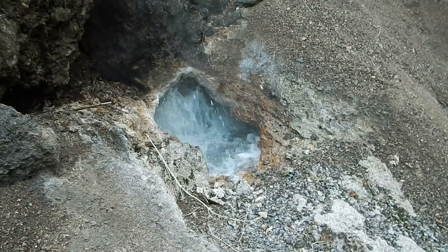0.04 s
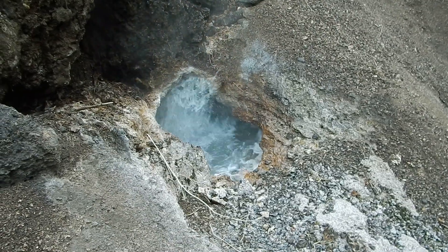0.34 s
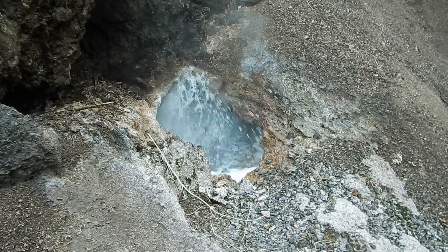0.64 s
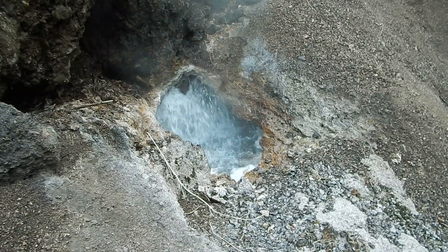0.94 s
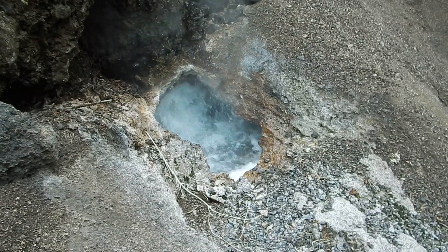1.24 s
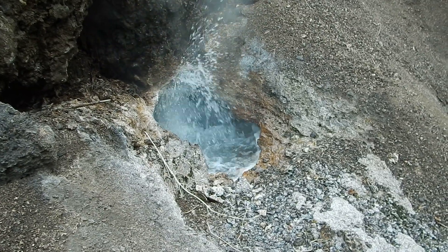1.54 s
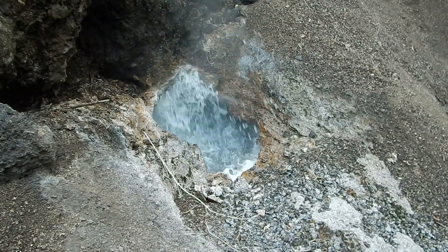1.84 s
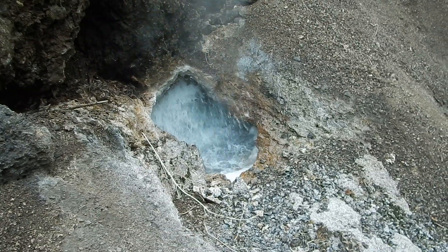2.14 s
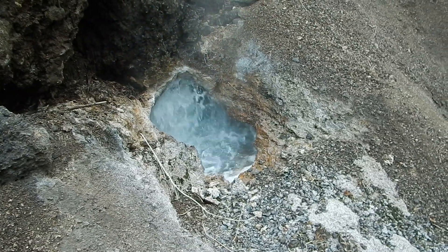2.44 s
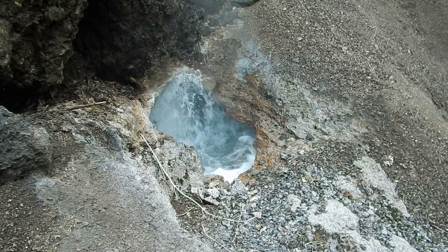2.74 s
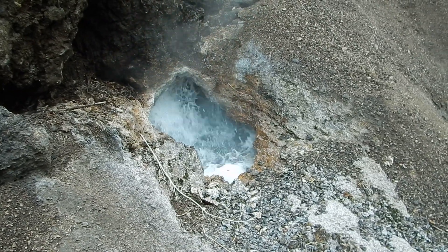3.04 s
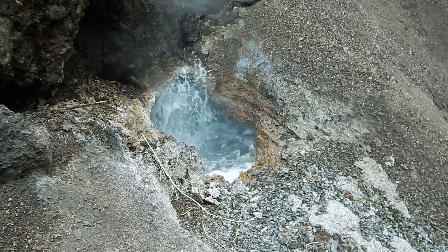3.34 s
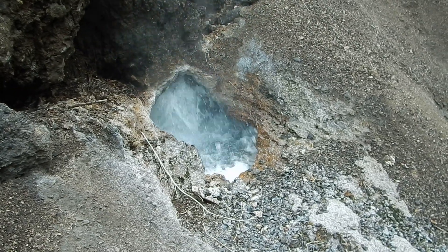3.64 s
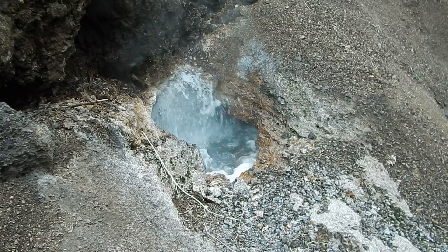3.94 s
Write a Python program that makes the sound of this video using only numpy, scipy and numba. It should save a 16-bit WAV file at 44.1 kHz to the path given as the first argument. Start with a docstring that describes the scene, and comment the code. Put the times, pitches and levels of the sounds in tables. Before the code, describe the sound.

A hot spring boils in a small rock hole outdoors, a few metres away. A strong low rumble with occasional heavy thumps runs under churning bubbles, while spray patters down in waves and water sharply slaps the rock.

```python
"""A hot spring boils in a small rock hole outdoors, a few metres away.
Big steam bubbles rumble in its throat; now and then one collapses with a heavy thump.
Smaller bubbles churn the surface. About once a second the water heaves up and rains back
as spray, and lumps of water slap the rock in sharp splats. A faint, steady hiss lies behind it."""
import sys
import numpy as np
from scipy import signal
from scipy.fft import rfft, irfft
from scipy.io import wavfile
from numba import njit

SR = 44100
rng = np.random.default_rng(int(sys.argv[2]) if len(sys.argv) > 2 else 0)


def persist_wave(psi):
    """Save psi, clipped to +-1, as 16-bit WAV."""
    counts = np.round(np.clip(psi, -1, 1) * 32767).astype(np.int16)
    wavfile.write(sys.argv[1], SR, np.atleast_2d(counts).T)


N = 176400


def gain(db):
    """Turn decibels into a number to multiply by."""
    return 10 ** (np.asarray(db) / 20)


def unit(x):
    """Scale a sound to an average (rms) strength of 1."""
    return x / np.sqrt(np.mean(x ** 2))


def loudness(rows):
    """Join (t/s, level/dB) points into a gain over time."""
    return gain(np.interp(np.arange(N) / SR, *np.array(rows).T))


def along_hz(rows, column=1):
    """Spread one column of a table smoothly from bass to treble."""
    rows = np.array(rows, float)
    hz = np.arange(N + 1) * SR / (2 * N)
    return np.interp(np.log(hz + 1), np.log(rows[:, 0]), rows[:, column])


def colour(x, tone):
    """Turn each frequency up or down by a (f/Hz, level/dB) table."""
    cepstrum = irfft(np.log(gain(along_hz(tone))))
    # make the filter ring after a sound, never before it
    cepstrum[1:N] *= 2
    cepstrum[N + 1:] = 0
    return irfft(rfft(x, 2 * N) * np.exp(rfft(cepstrum)))[:N]


def noise(tone):
    """A steady rush with the given tone."""
    return unit(colour(rng.standard_normal(N), tone))


def wander(rate):
    """Drift by about 1 either way, to a new random value `rate` times a second."""
    position = np.arange(N) / SR * rate % 4096
    return np.interp(position, np.arange(4096), rng.standard_normal(4096)) * np.sqrt(1.5)


@njit
def ring(start, hz, cycles, size, glide):
    """Each bubble is a pure note whose pitch rises as it fades."""
    out = np.zeros(N)
    for k in range(len(start)):
        length, phase = cycles[k] * SR / hz[k], 0.
        for i in range(min(int(length), N - int(start[k]))):
            age = i / length
            phase += 2 * np.pi * hz[k] * (1 + glide * age) / SR
            out[int(start[k]) + i] += size[k] * np.exp(-6 * age) * np.sin(phase)
    return out


def bubbles(lo_hz, hi_hz, cycles, spread_db, glide, count):
    """A swarm of bubbles, each with a random time, pitch and strength."""
    when, pitch, strength, length = rng.random((count, 4)).T
    hz = lo_hz * (hi_hz / lo_hz) ** pitch
    size = gain(-spread_db * np.log(1 - .99 * strength)) * hz  # boost the short, high notes
    size *= np.sign(rng.standard_normal(count))
    return unit(ring(when * N, hz, cycles * (.5 + length), size, glide))


# The deep tone of the spring's throat: f/Hz, level/dB
THROAT_TONE = [(20, -35), (40, -15), (62, -5.5), (90, -2.5), (125, -1.5), (175, 0), (235, -5), (310, -5),
               (390, -9.5), (470, -19.5), (700, -58.5), (1500, -79)]
# How hard the throat boils: t/s, level/dB
BOIL_LEVEL = [(0, -21.5), (.28, -19.5), (.45, -23), (.6, -23), (.72, -20), (.88, -22.5), (1.02, -19.5),
              (1.17, -26), (1.3, -21.5), (1.52, -22.5), (1.75, -22), (2.0, -21), (2.15, -21), (2.6, -20),
              (2.85, -21.5), (2.98, -22.5), (3.25, -23), (3.33, -22), (3.45, -20.5), (4, -20.5)]

def rumble():
    """Big bubbles throb in the throat over the roll of swirling water."""
    throbs = bubbles(82.6, 431, cycles=8.7, spread_db=1.2, glide=.12, count=2200)
    boil = unit(colour(throbs, THROAT_TONE)) + gain(-3.5) * noise(THROAT_TONE)
    return unit(boil) * loudness(BOIL_LEVEL) * gain(1.22)


# The tone of the bubbling surface: f/Hz, level/dB
SURFACE_TONE = [(300, -18), (490, -3), (610, 0.5), (900, -1), (1200, -5), (1750, -5.5), (2050, -4.5),
                (2600, -13.5), (4000, -45), (9000, -63)]
# How hard the surface churns: t/s, level/dB
CHURN_LEVEL = [(0.0, -30), (0.37, -29), (0.43, -34), (0.49, -31), (0.6, -34.5), (0.63, -29.5),
               (1.31, -30.5), (1.58, -28), (1.65, -32), (2.03, -28), (2.12, -30.5), (2.15, -26),
               (2.27, -31.5), (2.62, -29.5), (3.06, -33.5), (3.09, -27), (3.19, -30.5), (3.94, -29.5),
               (3.95, -34), (4.0, -27.5)]

def churn():
    """Small bubbles burble at the surface in a wash of foam."""
    burble = bubbles(492.7, 2793, cycles=31.7, spread_db=2.5, glide=.24, count=4000)
    foam = noise(SURFACE_TONE)
    water = unit(colour(burble, SURFACE_TONE)) + gain(-1.5) * foam
    return unit(water * gain(1.04 * wander(35))) * loudness(CHURN_LEVEL) * gain(-.39)


# The bright tone of falling drops: f/Hz, level/dB
SPRAY_TONE = [(500, -16.5), (1200, -6), (2000, -10), (2800, -5), (3500, -0.5), (4200, -3), (4800, -1),
              (5400, 0.5), (6200, -4.5), (7000, -11), (8000, -19), (9000, -25), (10200, -32),
              (11600, -37.5), (13000, -46), (16000, -48)]
# The thin, high tone of mist: f/Hz, level/dB
MIST_TONE = [(3000, -26), (6000, 3.5), (7500, 0), (9000, -7.5), (10500, -19), (12000, -29), (15000, -40)]
# How much spray is falling back: t/s, level/dB
SPRAY_LEVEL = [(0, -27.5), (.2, -31), (.35, -31), (.5, -34), (.78, -28), (1.08, -27.5), (1.2, -30),
               (1.47, -31), (1.75, -30.5), (1.93, -27.5), (2.17, -27.5), (2.36, -32.5), (2.7, -29),
               (3.17, -28.5), (3.24, -32), (3.36, -34), (3.49, -29.5), (3.7, -30), (4, -33)]

def spray():
    """Drops patter in clumps, some trapping tiny ringing bubbles, over fizz and spurts of mist."""
    when, strength, sign = rng.random((16000, 3)).T
    drop_db = -4.95 * np.log(1 - .99 * strength)  # many soft drops, a few loud ones
    ticks = np.bincount((when * N).astype(int), gain(drop_db) * np.sign(sign - .5), N)
    pings = bubbles(1700, 6000, cycles=16, spread_db=3.8, glide=.1, count=5000)
    drops = unit(colour(ticks, SPRAY_TONE)) + gain(-5) * unit(colour(pings, SPRAY_TONE))
    fizz = noise(SPRAY_TONE)
    clumps = gain(1.4 * wander(55) + 1.8 * wander(240))
    mist = noise(MIST_TONE) * gain(3.2 * wander(40) + 3.8 * wander(300))
    shower = drops * clumps + gain(-2.5) * fizz + gain(-15.5) * unit(mist)
    return unit(shower) * loudness(SPRAY_LEVEL) * gain(1.89)


# The tone of the background hiss: f/Hz, level/dB
HISS_TONE = [(2000, -10), (5000, 6.5), (7000, -6), (9000, -23), (10500, -30), (13000, -33), (16000, -29)]

def background_hiss():
    """A faint, steady hiss, separate in each channel."""
    return np.array([noise(HISS_TONE), noise(HISS_TONE)]) * gain(-48)


# Big steam bubbles collapsing, with their starting pitch: t/s, f/Hz, level/dB
COLLAPSES = [(.114, 150, -5.5), (0.77, 141, -7), (0.804, 209.5, -7), (1.348, 148, -5), (3.195, 138, -7.5)]

def thumps(swell_s=.0083, breakup_s=.015, glide=.12):
    """A big bubble's note swells and quickly dies as it breaks into smaller bubbles."""
    out = np.zeros(N)
    swarm = bubbles(116, 378, cycles=17.5, spread_db=1.5, glide=.13, count=3000)
    pieces = unit(colour(swarm, THROAT_TONE))
    swell = lambda age: age ** 2 * np.exp(2 - 2 * age)  # loudest at age 1
    for start, hz, db in COLLAPSES:
        t = np.maximum(np.arange(N) / SR - start, 0)
        age = t / swell_s
        bend = 1 + glide * np.minimum(age, 10) / 10
        body = swell(age) * np.sin(2 * np.pi * hz * t * bend)
        breakup = gain(-11.5) * swell(t / breakup_s) * pieces
        out += gain(db) * (body + breakup)
    return out


# Lumps of water hitting rock, levels relative to one another: t/s, level/dB, f/Hz
SLAPS = [(.342, -8, 4400), (0.386, -11.5, 4030), (.817, -5.5, 4200), (.98, -4, 2920), (1.009, -6.5, 4870),
         (1.241, -8, 3400), (1.3, -10, 3820), (1.629, -10, 4850), (2.077, -14, 4000), (2.147, -2, 5050),
         (2.596, -13, 4000), (2.763, -10, 5500), (2.813, -3.5, 5000), (2.921, -7.5, 3600),
         (3.508, -9.5, 5000), (3.622, -4.5, 4600), (3.7893, -12, 3500)]

def splats(slap_s=.0009, droplets_s=.0068):
    """Water slaps the rock sharply, then scatters briefly as droplets."""
    out = np.zeros(N)
    age = np.arange(2048) / SR
    fade = np.exp(-age / slap_s) + gain(-8) * np.exp(-age / droplets_s)
    for start, db, hz in SLAPS:
        burst = rng.standard_normal(len(age)) * fade
        slap = signal.lfilter(*signal.iirpeak(hz, Q=.8, fs=SR), burst)
        slap *= gain(db + 3) / np.abs(slap).max()
        at = int(start * SR)
        out[at:at + len(age)] += slap[:N - at]
    return colour(out, SPRAY_TONE)


# Sound bouncing off the rocks, compared with the direct sound: f/Hz, level/dB
ROCK_TONE = [(25, -14), (60, -21), (125, -24.5), (220, -32), (320, -46), (480, -32), (620, -33),
             (880, -42.5), (1030, -54), (1250, -56), (1600, -18.5), (2100, -17), (2400, -17), (2700, -16),
             (5000, -11), (6100, -5), (7400, -21), (8800, -5), (9800, -4.5), (11500, -4.5), (13000, -4),
             (16000, -2)]

def rock_scatter():
    """The rocks at the sides throw back a softer wash of boiling and spray."""
    return colour(rumble() + churn() + spray(), ROCK_TONE)


def scene(fade_s=.003):
    """The water sounds from one spot and the rocks spread it left and right, over a faint hiss."""
    water = rumble() + thumps() + churn() + spray() + splats()
    side = rock_scatter()
    stereo = np.array([water + side, water - side]) + background_hiss()
    t = np.arange(N) / SR
    edge_fade = np.minimum(np.minimum(t, t[::-1]) / fade_s, 1)
    return stereo * edge_fade


# Two microphones in their case, left compared with right: f/Hz, level/dB, phase lead/rad
MIC_CASE = [(30, 1, -.15), (130, .1, 0), (310, 0, 0), (1350, 0, 0), (1850, -.3, .22), (1990, 2, .52),
            (2090, 4.5, -.12), (2300, .4, -.1), (2520, 0, 0), (2690, -5, .25), (2940, 2, 1), (3250, 3, .6),
            (3540, 7, .6), (3660, 10, -.2), (3880, 3, -.6), (4150, -5, 0), (4350, -1.5, .8),
            (4850, 5.5, .6), (5050, 4.5, .5), (5350, 9, .75), (5550, 12, .1), (5850, 8, .15),
            (6120, 11, -.1), (6300, 8.5, -.7), (7400, 1.5, 0), (9200, 4, 1.3), (10000, 4.5, 2.7),
            (11000, 5, 2.9), (11800, 10.5, 6.7), (13100, 3, 7.3), (14000, 3, 8.1)]
# Narrow gaps cut out of the treble: f/Hz
GAPS_HZ = [2500, 5000, 6000, 7000, 8000, 9000, 10000, 11000]

def record(dry, top_hz=15800):
    """The case gives each microphone its own tone; filters cut narrow gaps and the highest treble."""
    left = gain(along_hz(MIC_CASE) / 2) * np.exp(.5j * along_hz(MIC_CASE, column=2))
    mics = np.array([left, 1 / left])
    mics /= np.sqrt(np.mean(np.abs(mics) ** 2, axis=0))
    out = irfft(rfft(dry, 2 * N) * mics)[:, :N]
    for k, hz in enumerate(GAPS_HZ):
        width_hz = 96 if k else 200
        out = signal.lfilter(*signal.iirnotch(hz, hz / width_hz, fs=SR), out)
    return signal.sosfilt(signal.ellip(10, .1, 80, top_hz, fs=SR, output="sos"), out)


dry = scene()
out = record(dry)
persist_wave(out)
```